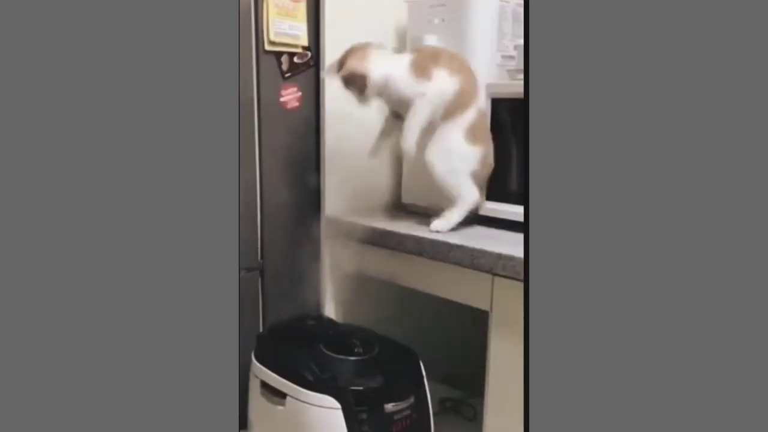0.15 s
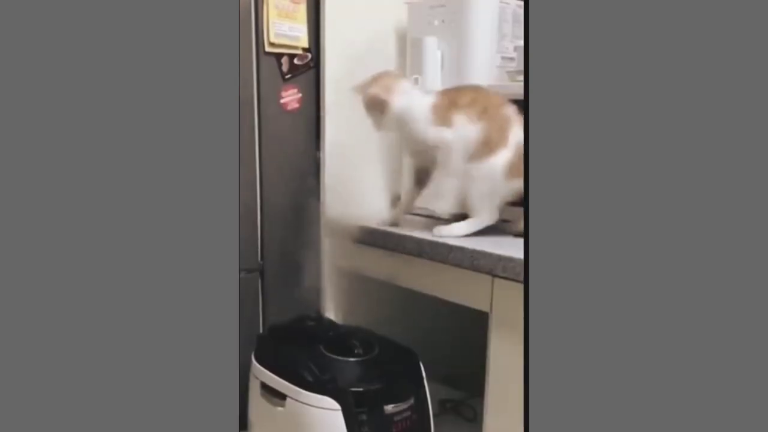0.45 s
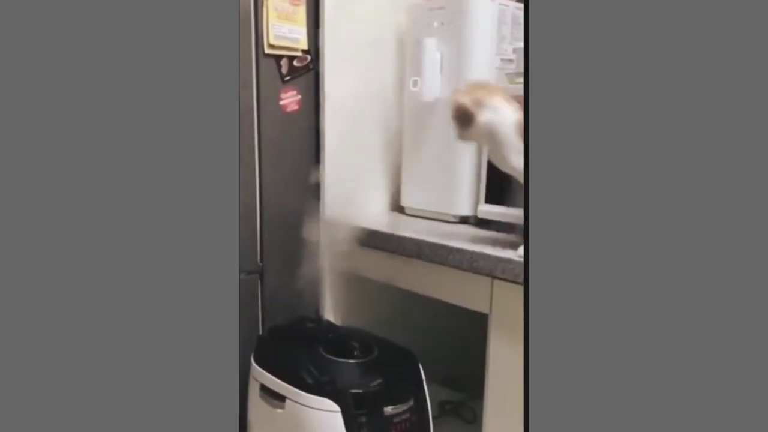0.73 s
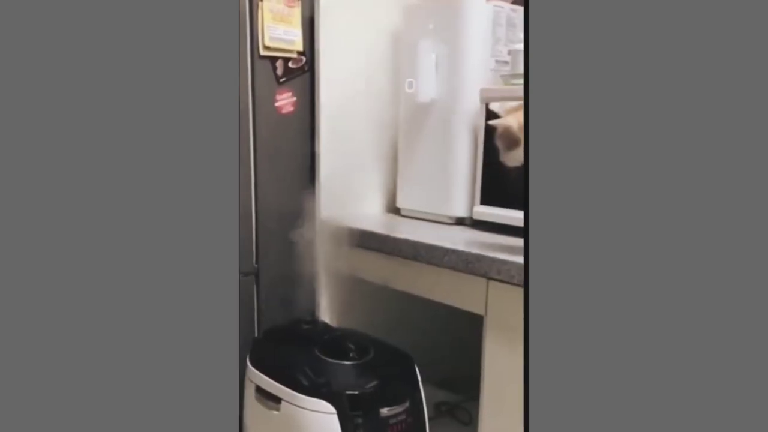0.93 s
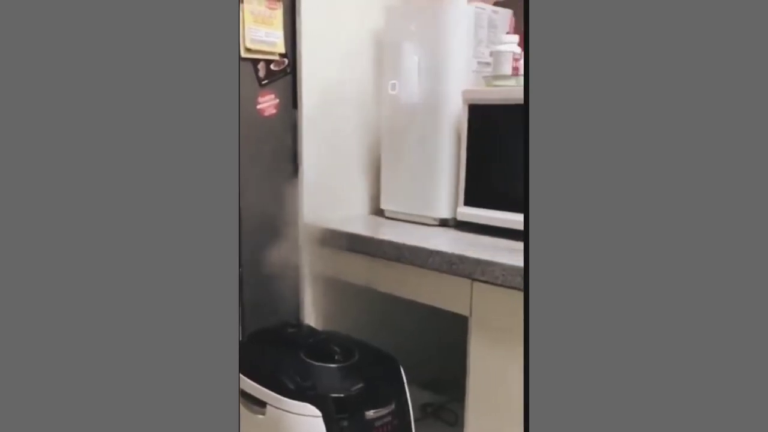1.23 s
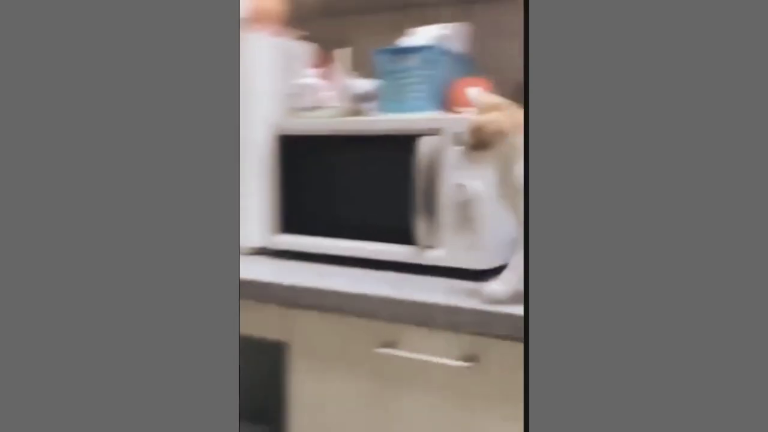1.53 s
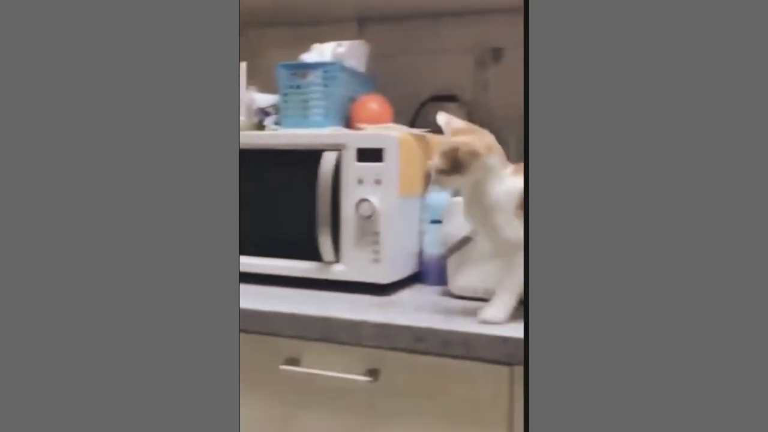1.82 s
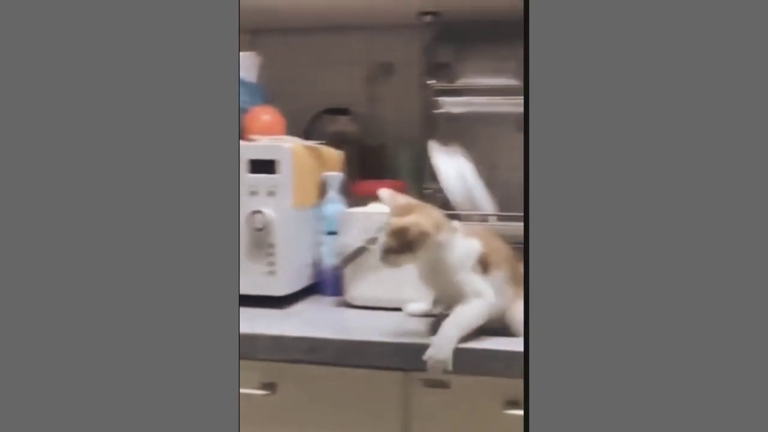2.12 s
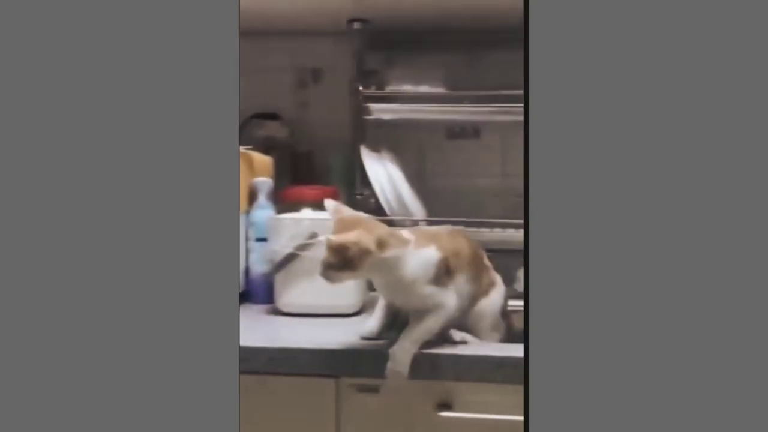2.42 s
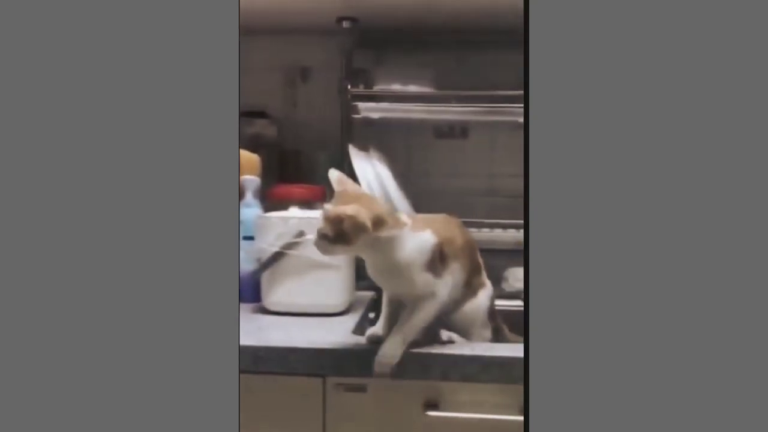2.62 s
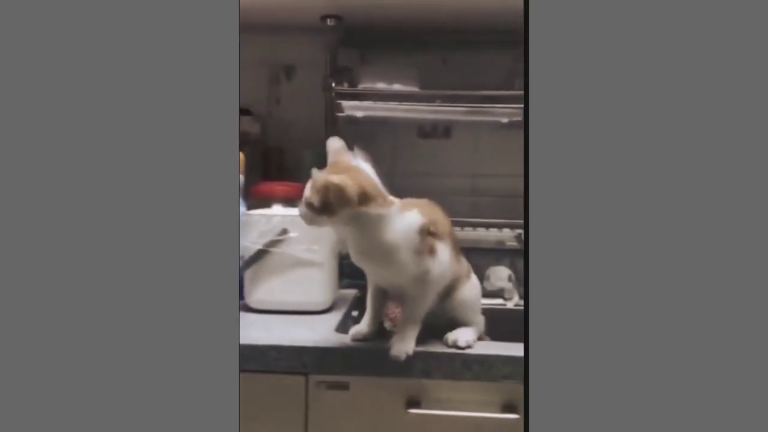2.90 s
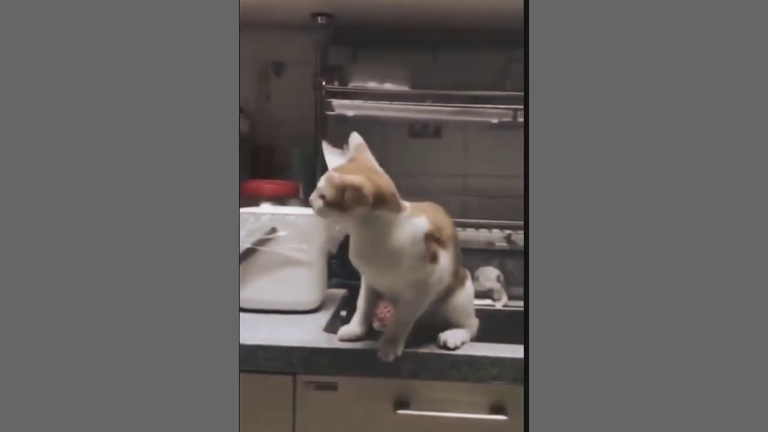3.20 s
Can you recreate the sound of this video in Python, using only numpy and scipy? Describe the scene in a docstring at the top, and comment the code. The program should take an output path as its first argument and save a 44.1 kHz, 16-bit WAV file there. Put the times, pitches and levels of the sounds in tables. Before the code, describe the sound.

After a brief faint rustle, steam bursts from a cooker and settles into a bright, breathy, flickering hiss with faint whistling pitches. Soft cat thuds lie beneath; close mono microphone, hard walls nearby, sound thinning momentarily.

```python
"""Steam vent in a kitchen

An electric cooker on a kitchen floor opens its valve: a soft rustle, a tick, a whump, then steady hiss.
The hiss is flickering noise plus narrow vent rings, combed by near walls, heard mono from a metre away.
Shaped noise makes the cat's rustle, rumble and scuffs, and short sines its dull paw thuds on the worktop;
low noise is the room floor. Now and then the sound thins for an instant to a few tones, once with a low one."""
import sys
import numpy as np
from scipy import signal
from scipy.fft import rfft, irfft
from scipy.io import wavfile
from scipy.ndimage import uniform_filter1d, minimum_filter1d

SR = 44100
rng = np.random.default_rng(int(sys.argv[2]) if len(sys.argv) > 2 else 0)


def invert_db(x):
    """Field ratio 10**(x/20) for x, a level in decibels (scalar or array-like)."""
    u = np.asarray(x, float) / 20
    return 10 ** u


def pcm_store(signal):
    """Save signal as 16-bit PCM."""
    levels = np.round(np.clip(np.atleast_2d(signal), -1, 1) * 32767)
    wavfile.write(sys.argv[1], SR, levels.astype(np.int16).T)


N = 147735
T = np.arange(N) / SR  # time in s

# short low sines, the paw thuds and one low tone:
# start_s, level_db (sine rms at the top of the hump), pitch_hz (before wander), length_s
LOW_SINES = [(.44, -40, 115, 0.054), (0.538, -30.5, 340, .05), (1.053, -26.5, 115, 0.096),
             (1.094, -35.5, 217, 0.058), (1.203, -25, 90.7, 0.065), (1.246, -32.5, 70.3, 0.12),
             (2.003, -38, 197.5, 0.034), (2.22, -40, 179, 0.06), (2.26, -19.5, 250, 0.052),
             (2.349, -30, 201.4, 0.022), (2.364, -36, 72, .09)]
LOW_TONE = [row for row in LOW_SINES if row[2] == 250]  # the one at 250 Hz, same columns
PAW_HITS = [row for row in LOW_SINES if row[2] != 250]  # all the others, same columns


def level(x, db):
    """Scale to an rms level in dB."""
    return x * invert_db(db) / np.sqrt(np.mean(x ** 2))


def walk(rate_hz):
    """Random levels held for 1 / rate_hz seconds and slewed twice; spread near 1."""
    hold = int(SR / rate_hz)
    steps = np.repeat(rng.standard_normal(N // hold + 1), hold)
    slewed = uniform_filter1d(uniform_filter1d(steps, hold), hold)
    return 0.73 * slewed[:N]


def colour(x, table):
    """Filter by (Hz, dB) points joined on a log frequency axis; rms 1."""
    hz, db = np.array(table, float).T
    f = np.fft.rfftfreq(N, 1 / SR) + 1  # the added 1 keeps the log finite
    gain = invert_db(np.interp(np.log(f), np.log(hz), db))
    return level(irfft(rfft(x) * gain, N), 0)


def coloured_noise(table):
    """White noise filtered to a spectrum of (Hz, dB) points; rms 1."""
    return colour(rng.standard_normal(N), table)


def ring(x, hz, width_hz):
    """Two-pole resonance: noise through it becomes a breathy pitch."""
    return signal.lfilter(*signal.iirpeak(hz, hz / width_hz, fs=SR), x)


def swell(start_s, rise_s, fall_s):
    """Envelope that rises and dies away from a start time, peak 1."""
    u = np.maximum(T - start_s, 0)
    e = (1 - np.exp(-u / rise_s)) ** 2 * np.exp(-u / fall_s)
    return e / e.max()


def curve(table):
    """Gain from (s, dB) points, at -90 dB outside them."""
    s, db = np.array(table).T
    return invert_db(np.interp(T, s, db, left=-90, right=-90))


def bump(centre_s, length_s):
    """One smooth hump, peak 1."""
    return np.cos(np.pi * np.clip((T - centre_s) / length_s, -.5, .5)) ** 2


def turbulent_jet():
    """Jet noise whose overlapping bands, half an octave apart, each flicker in level on their own."""
    # turbulence spectrum of the jet: freq_hz, density_db (relative, per Hz)
    jet_colour = [(250, -26), (500, -24), (900, -22.5), (1900, -11.5), (2400, -14.5), (2800, -9.5),
                  (3300, -7.5), (3700, -6.5), (4300, -11.5), (5400, -9), (6400, -0.5), (6600, -12.5),
                  (7000, -9), (8500, -9), (10200, -15), (15000, -12.5), (15500, -11.5), (15700, -60)]
    flicker_db = 1.5
    spectrum = rfft(coloured_noise(jet_colour))
    octave = np.log2(np.fft.rfftfreq(N, 1 / SR) + 1)
    jet = np.zeros(N)
    for centre in np.arange(7, 15, .5):
        band = irfft(spectrum * np.clip(1 - 2 * abs(octave - centre), 0, 1), N)
        jet = jet + invert_db(flicker_db * walk(14)) * band
    return jet


def vent_rings():
    """Narrow resonances of the vent and its cap, each excited by its own noise."""
    # rings: pitch_hz, width_hz, level_db (rms before the level curve and the flow)
    vent_modes = [(2133, 113, -37.5), (2574, 63, -35), (2720, 13, -40), (2881, 14.7, -29.5),
                  (3220, 8.4, -45.5), (3075, 53, -31), (3160, 42, -29), (3324, 32, -30), (3440, 11, -33.5),
                  (3622, 28, -34), (3650, 25, -45.5), (4696, 20, -37.5), (5310, 80, -36.5),
                  (7390, 210, -34.5)]
    # common level of the rings: time_s, gain_db
    ring_gain = [(.17, 0), (.6, 1), (1.2, 0.5), (1.8, 0.5), (2.4, 0), (3.35, -1)]
    rings = sum(level(ring(rng.standard_normal(N), hz, width), db) for hz, width, db in vent_modes)
    return curve(ring_gain) * rings


def steam():
    """Jet and rings share one flow that surges as the valve opens, then sags; a whump and clang mark its start."""
    # whump of the first steam: freq_hz, density_db (relative, per Hz)
    whump_colour = [(60, -17), (150, -12), (390, -1), (700, -1), (1100, 0.5), (1600, 0), (2400, -2),
                    (3200, -40)]
    opens_s, rise_s = 0.161, 0.015
    surge_db, surge_s, sag_db_per_s, swell_db = 6, 0.044, -0.23, 2.6
    jet_db = -18.5  # before the flow
    whump_s, whump_db, whump_rise_s, whump_fall_s = 0.1715, -17.5, .016, .024

    u = np.maximum(T - opens_s, 0)
    opening = (1 - np.exp(-u / rise_s)) ** 2
    flow_db = surge_db * np.exp(-u / surge_s) + sag_db_per_s * u + swell_db * walk(4.87)
    hiss = opening * invert_db(flow_db) * (invert_db(jet_db) * turbulent_jet() + vent_rings())

    whump = invert_db(whump_db) * swell(whump_s, whump_rise_s, whump_fall_s) * coloured_noise(whump_colour)
    # the body rings on after the whump: 1074 Hz, 80 Hz wide, -29 dB before its envelope
    body_ring = level(ring(rng.standard_normal(N), 1074, 80), -29)
    clang = swell(whump_s, whump_rise_s, .05) * body_ring
    return hiss + whump + clang


def wall_echoes(jet):
    """Delayed copies from near surfaces, which comb the hiss."""
    # echoes: delay_s, level_db (relative to the direct sound)
    near_walls = [(.0038, -16.5), (.0110, -14), (0.0224, -16)]
    return sum(invert_db(db) * np.interp(T - lag, T, jet, left=0) for lag, db in near_walls)


def valve_tick():
    """The valve lifts with a small tick of escaping steam: noise that starts at once and decays."""
    # tick: freq_hz, density_db (relative, per Hz)
    tick_colour = [(1500, -32), (2600, -1), (3100, 7), (3500, -2), (4100, -8), (5000, -22), (6200, -6),
                   (7000, -23)]
    tick_s, tick_db, tick_t60_s = .139, -31, .022
    fade = (T > tick_s) * np.exp(-np.log(1000) * np.maximum(T - tick_s, 0) / tick_t60_s)
    return invert_db(tick_db) * fade * coloured_noise(tick_colour)


def cat_movement():
    """Fur and paws as fluttering noise: a rustle at first, then a ragged rumble and dull scuffs."""
    # fur and paw rustle before the valve opens: freq_hz, density_db (relative, per Hz)
    rustle_colour = [(60, -26), (400, -5), (750, -12.5), (1400, -6), (2300, -16.5), (3500, -13),
                     (5000, -15), (6500, -26.5), (15000, -40)]
    # rustle level before flutter: time_s, level_db
    rustle_level = [(0, -49), (.02, -32), (.05, -39.5), (.075, -46), (.09, -49), (.16, -45)]
    # rumble: freq_hz, density_db (relative, per Hz)
    rumble_colour = [(30, -30), (60, -6.5), (110, -2.5), (160, -5.5), (250, -23.5), (500, -55)]
    # rumble level before flutter: time_s, level_db
    rumble_level = [(.3, -62), (.45, -42), (.6, -51), (.68, -43.5), (.82, -40.5), (1.0, -37), (1.15, -38),
                    (1.3, -47), (1.42, -63)]
    # scuffs: freq_hz, density_db (relative, per Hz)
    scuff_colour = [(90, -20), (170, -1), (260, 0), (360, -1), (480, -18.5), (800, -26)]
    # scuff level before flutter: time_s, level_db
    scuff_level = [(.3, -46), (.45, -47), (.57, -31), (.62, -49), (.9, -52), (1.12, -40.5), (1.3, -52.5),
                   (1.45, -62), (1.95, -68), (2.03, -42.5), (2.1, -65), (2.3, -39), (2.38, -38.5),
                   (2.45, -63)]
    rustle = curve(rustle_level) * invert_db(2.5 * walk(38)) * coloured_noise(rustle_colour)
    rumble = curve(rumble_level) * invert_db(1.6 * walk(18)) * coloured_noise(rumble_colour)
    scuffs = curve(scuff_level) * invert_db(6.0 * walk(25.8)) * coloured_noise(scuff_colour)
    return rustle + rumble + scuffs


def sine_humps(table):
    """Short sines that swell and fade, their pitch wandering a little."""
    wander_share = .05  # of the pitch
    warped_s = np.cumsum(1 + wander_share * walk(30)) / SR
    out = np.zeros(N)
    for start, db, hz, length in table:
        u = np.clip((T - start) / length, 0, 1)
        hump = np.sin(np.pi * u ** 0.55) ** 2  # rises faster than it falls
        out = out + invert_db(db) * np.sqrt(2) * hump * np.sin(2 * np.pi * hz * warped_s)
    return out


def paw_thuds():
    """Soft paws boom in the worktop: each thud is one short sine hump."""
    return sine_humps(PAW_HITS)


def low_tone():
    """A brief low tone near 250 Hz that stands out as the sound thins."""
    return sine_humps(LOW_TONE)


def room_floor():
    """Low room noise, drifting in level."""
    # room: freq_hz, density_db (relative, per Hz)
    room_colour = [(25, -20), (65, -1.5), (130, -6.5), (250, -6.5), (500, -15.5), (1400, -23), (2000, -38),
                   (6000, -55)]
    return invert_db(-48.5 + 5.9 * walk(7.85)) * coloured_noise(room_colour)


def thin(x):
    """At each thin moment the sound dips, while strong lines spread over the spectrum carry on as tones."""
    # moments when only a few thin tones carry on: centre_s, depth_db, length_s (of the hump behind the dip)
    thin_moments = [(0.555, -6.5, 0.041), (0.61, -20, 0.06), (0.797, -13, 0.018), (0.972, -5, 0.018),
                    (1.081, -8.5, 0.028), (1.168, -9.5, 0.037), (1.227, -10, 0.044), (1.441, -9.5, 0.048),
                    (1.654, -10, 0.039), (1.764, -8, 0.041), (1.838, -9, 0.033), (2.187, -18, 0.053),
                    (2.27, -11, 0.05), (2.338, -21, 0.049), (2.627, -8.5, 0.022), (2.669, -12.5, 0.025),
                    (2.793, -8, .035), (2.883, -7.5, 0.026), (3.041, -9, 0.045)]
    tone_s, tone_db, tone_spacing_hz, thin_top_hz = 0.058, -1, 500, 15160
    spared_low_hz, spared_high_hz, spared_share = 2870, 3676, 0.83  # loudest band of the hiss thins less

    f = np.fft.rfftfreq(N, 1 / SR)
    spared = spared_share * ((f > spared_low_hz) & (f < spared_high_hz))
    body = irfft(rfft(x) * (f < thin_top_hz) * (1 - spared), N)
    gain, tones, size = np.ones(N), np.zeros(N), 1024
    bins = np.fft.rfftfreq(size, 1 / SR)
    reach = int(tone_spacing_hz / bins[1])
    # tones are likeliest in the middle: none below 1800 Hz or above 9800 Hz
    likely = .7 * np.clip((9800 - bins) / 2000, 0, 1) * np.clip((bins - 1800) / 600, 0, 1)

    chances = rng.random((len(thin_moments), 3, size // 2 + 1))
    for (centre, db, length), chance in zip(thin_moments, chances):
        loss = 1 - invert_db(db)
        gain = gain * (1 - loss * np.minimum(2.07 * bump(centre, length), 1))  # flat-bottomed dip
        i = int(centre * SR) - size // 2
        lines = abs(rfft(body[i:i + size] * np.hanning(size))) * 4 / size
        is_peak = lines == -minimum_filter1d(-lines, reach)  # strongest within its stretch
        chosen = is_peak & (chance[0] < likely) & (lines > invert_db(-22) * lines.max())
        for k in np.flatnonzero(chosen):
            shape = bump(centre + .025 * (chance[1, k] - .5), tone_s)
            tone = np.sin(2 * np.pi * (bins[k] * T + chance[2, k]))
            tones = tones + loss * lines[k] ** 0.66 * shape * tone
    return x - body + gain * body + invert_db(tone_db) * tones


def scene():
    """Steam with its echoes, tick, cat, low tone and room floor; the same sound on two channels."""
    jet = steam()
    heard = jet + wall_echoes(jet)
    cat = cat_movement() + paw_thuds()
    mix = heard + valve_tick() + cat + low_tone() + room_floor()
    return np.tile(mix, (2, 1))


def low_pass(x):
    """Removes everything above the highest recorded frequency."""
    return signal.sosfilt(signal.butter(12, 16850, fs=SR, output="sos"), x)


def record(dry):
    """Add the thin moments and finish the mono mix on two channels."""
    mix = np.tile(thin(dry[0]), (2, 1))
    return low_pass(mix)


dry = scene()
out = record(dry)
pcm_store(out)
```